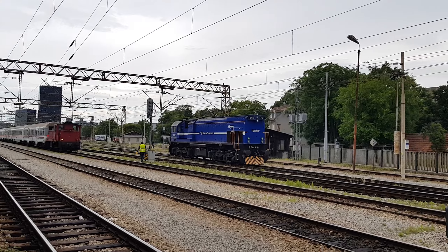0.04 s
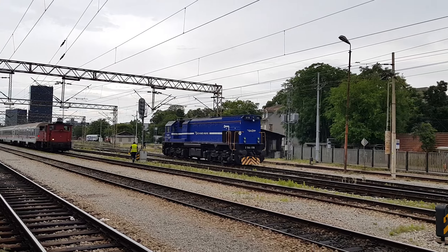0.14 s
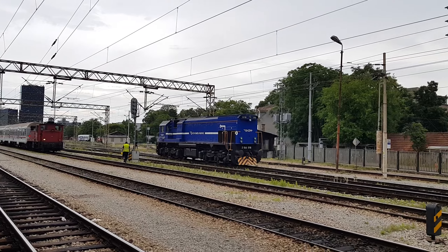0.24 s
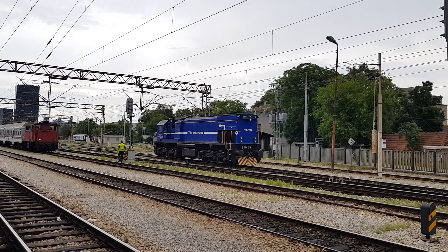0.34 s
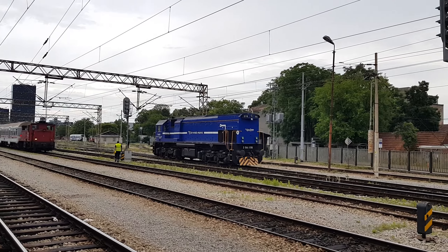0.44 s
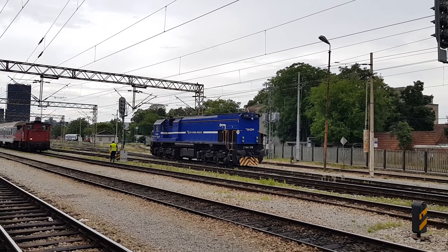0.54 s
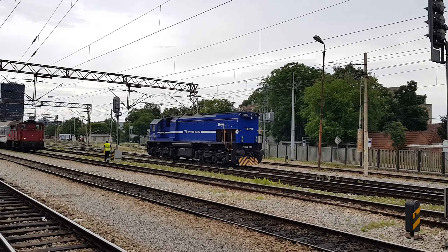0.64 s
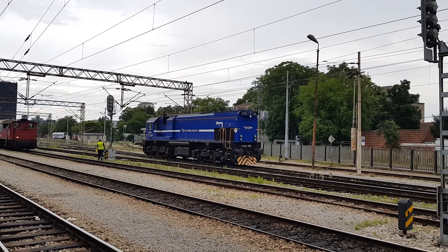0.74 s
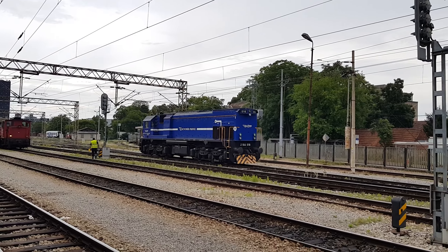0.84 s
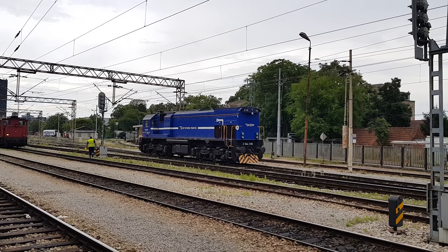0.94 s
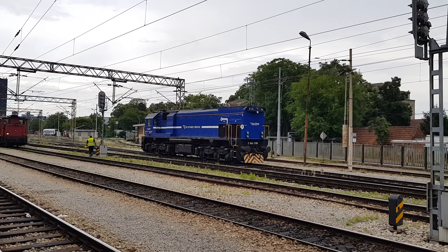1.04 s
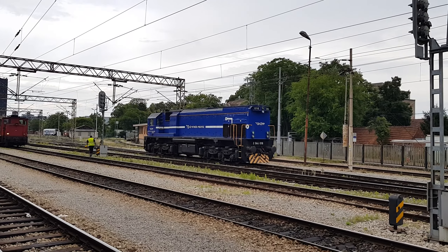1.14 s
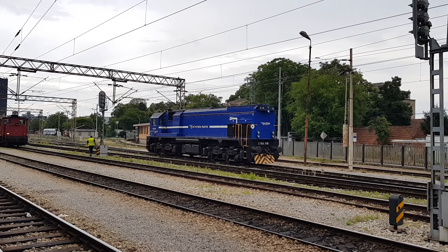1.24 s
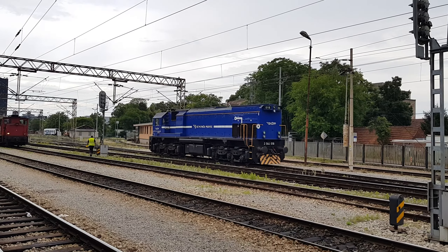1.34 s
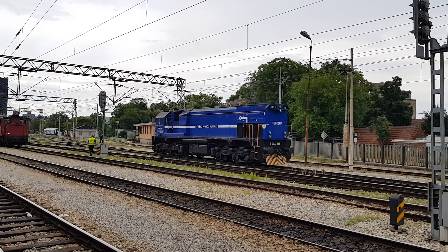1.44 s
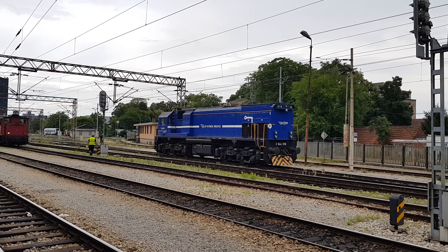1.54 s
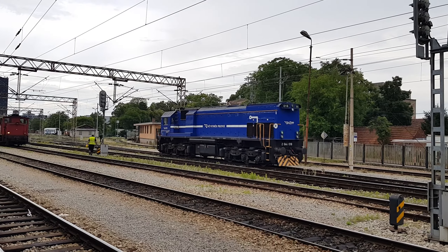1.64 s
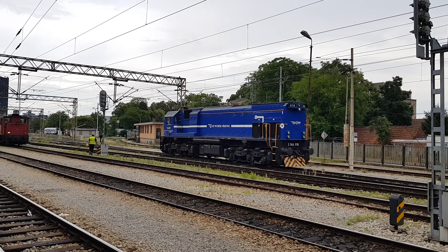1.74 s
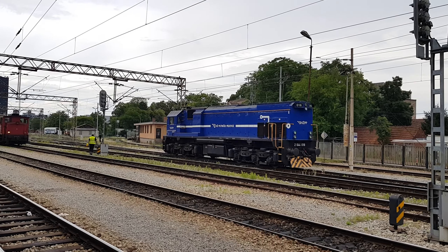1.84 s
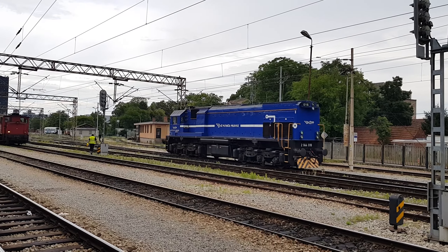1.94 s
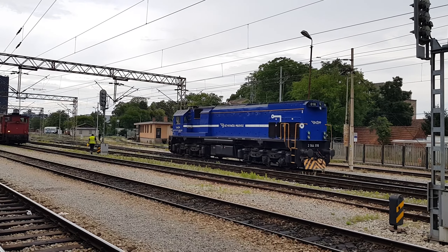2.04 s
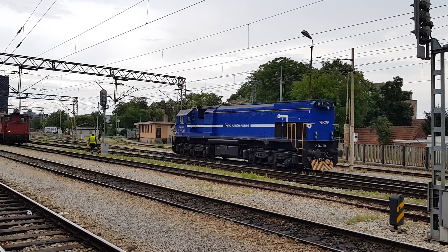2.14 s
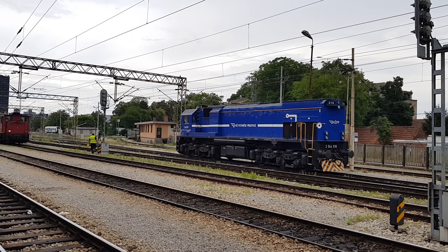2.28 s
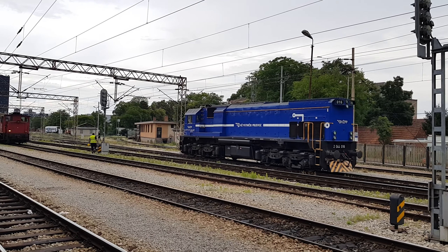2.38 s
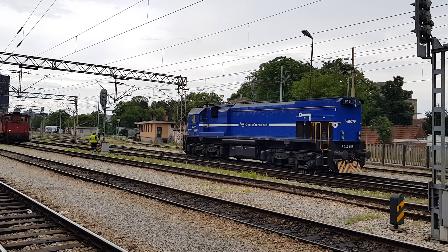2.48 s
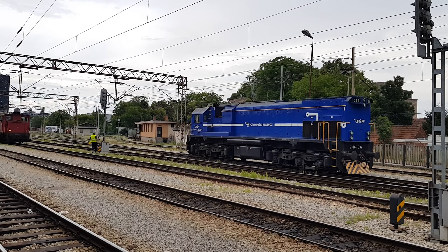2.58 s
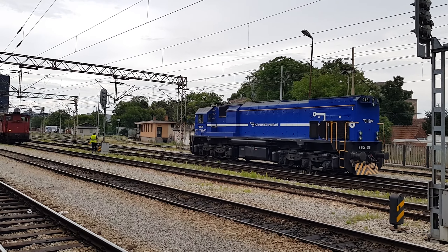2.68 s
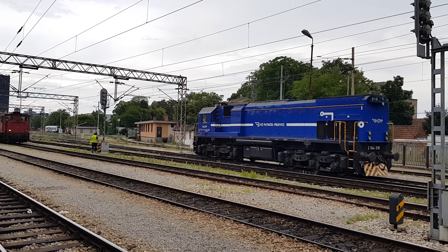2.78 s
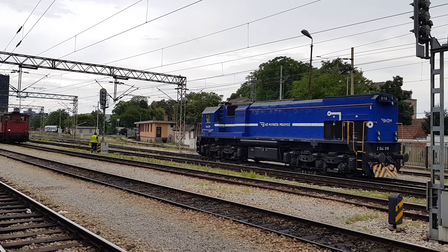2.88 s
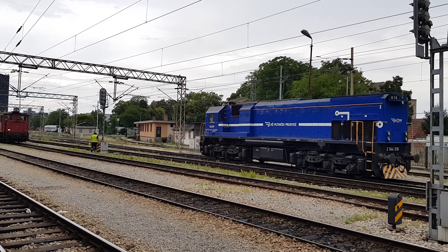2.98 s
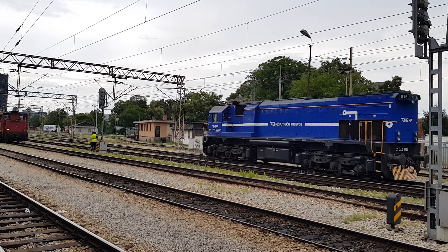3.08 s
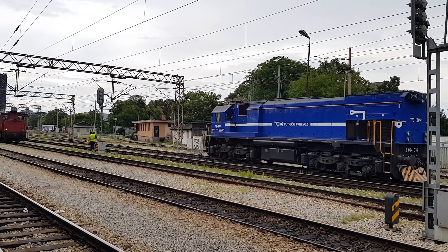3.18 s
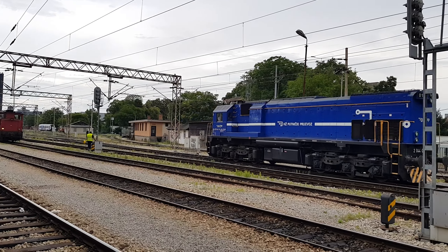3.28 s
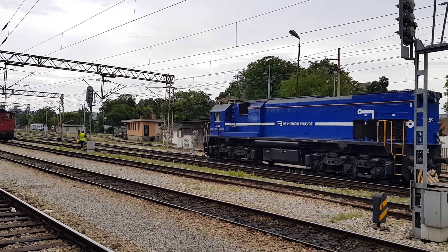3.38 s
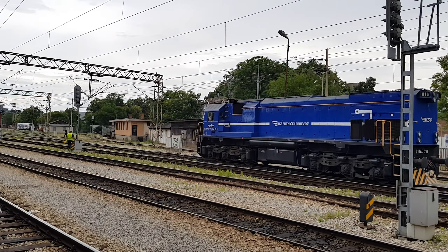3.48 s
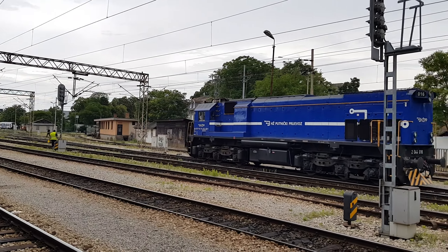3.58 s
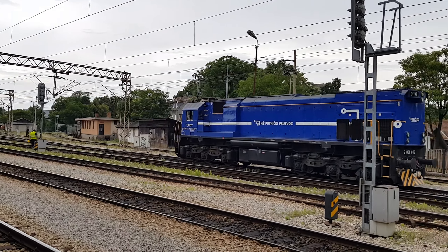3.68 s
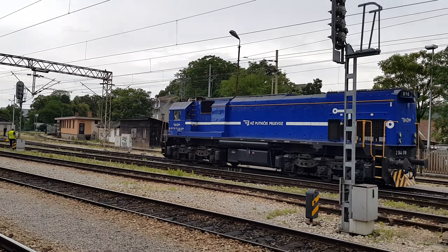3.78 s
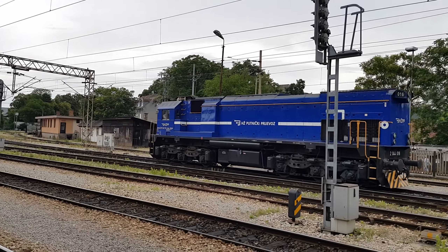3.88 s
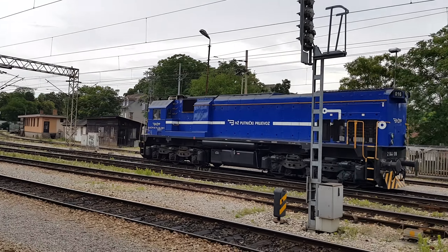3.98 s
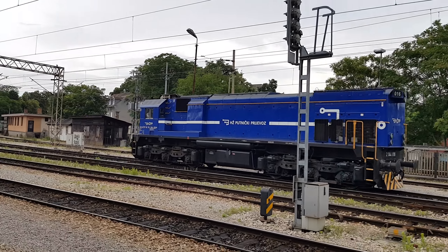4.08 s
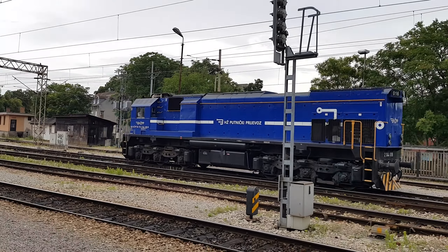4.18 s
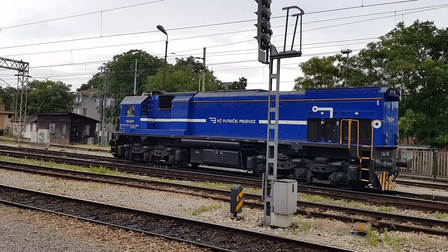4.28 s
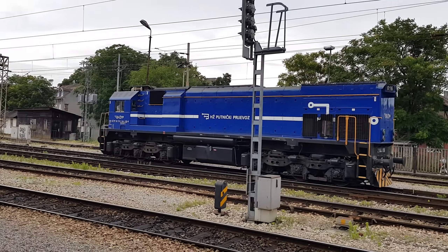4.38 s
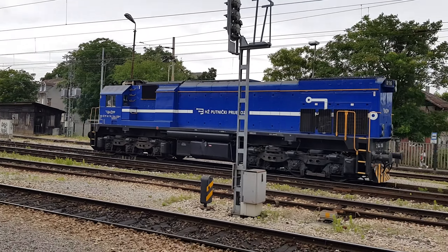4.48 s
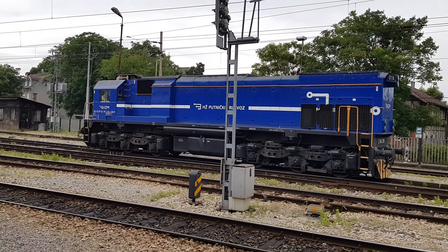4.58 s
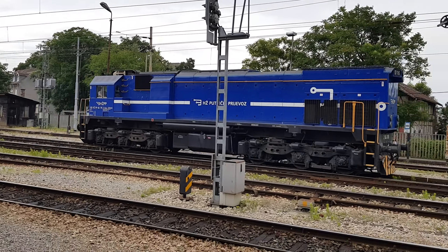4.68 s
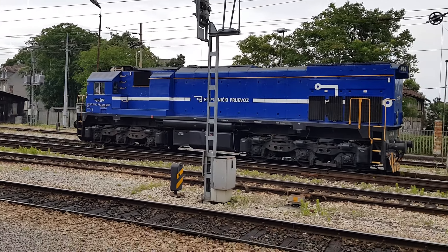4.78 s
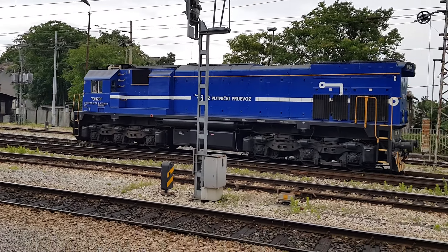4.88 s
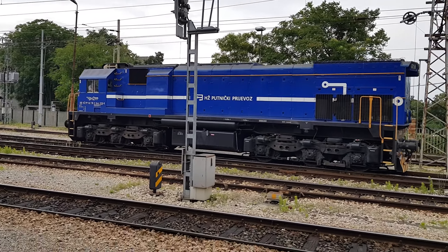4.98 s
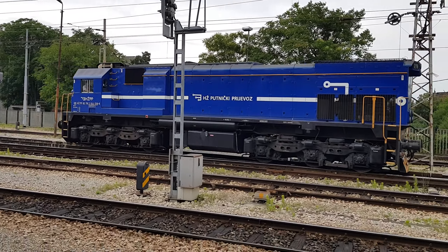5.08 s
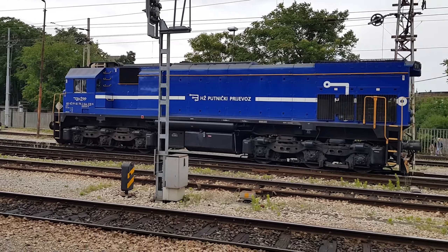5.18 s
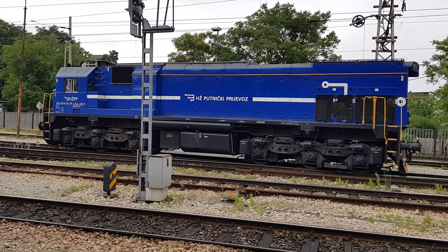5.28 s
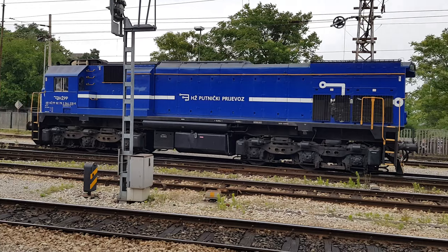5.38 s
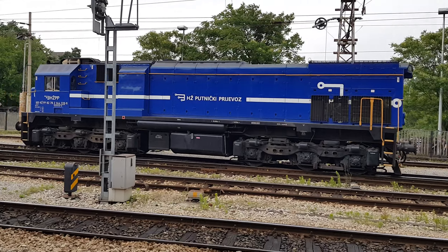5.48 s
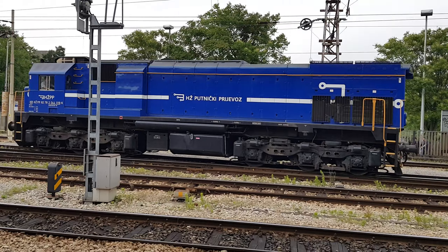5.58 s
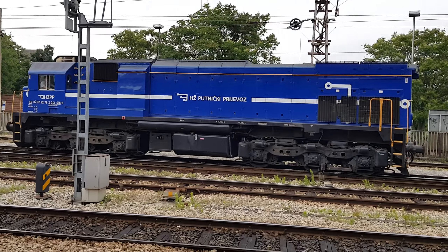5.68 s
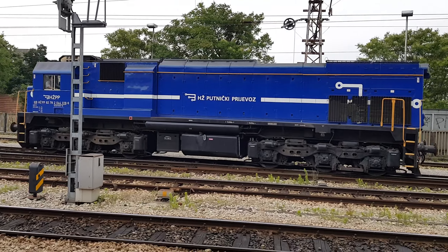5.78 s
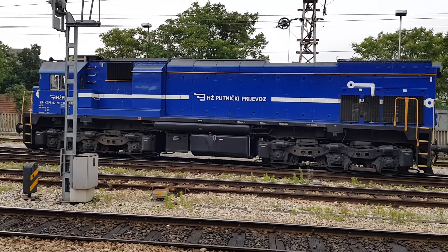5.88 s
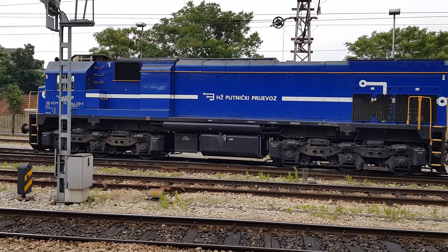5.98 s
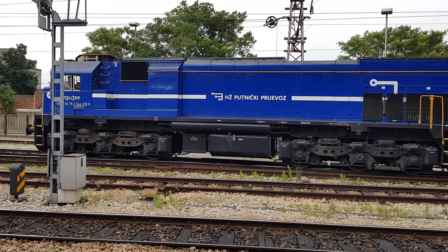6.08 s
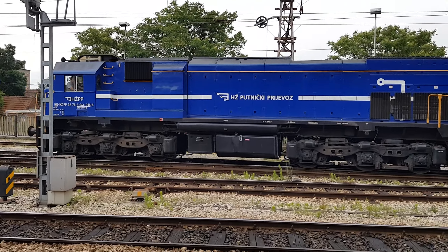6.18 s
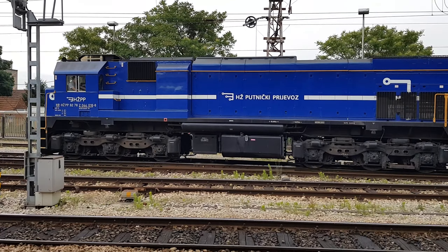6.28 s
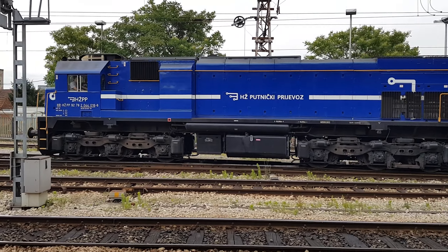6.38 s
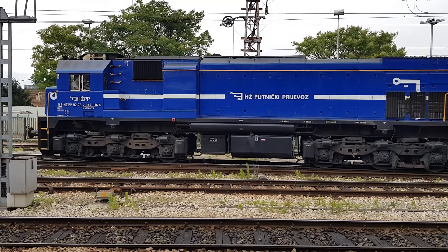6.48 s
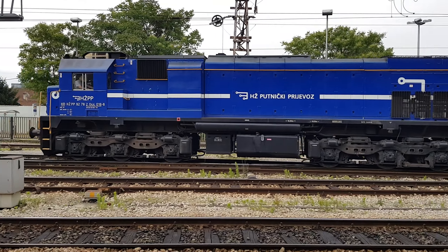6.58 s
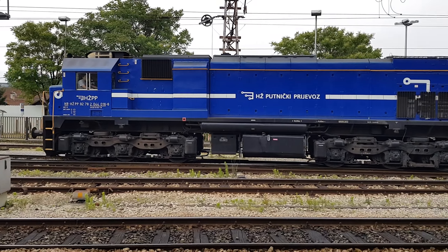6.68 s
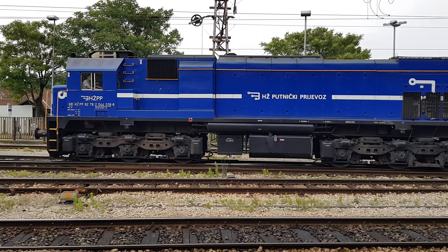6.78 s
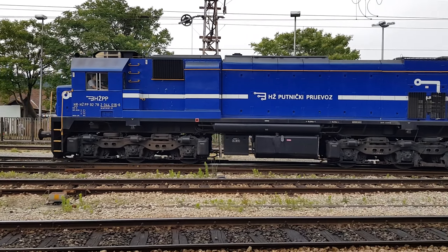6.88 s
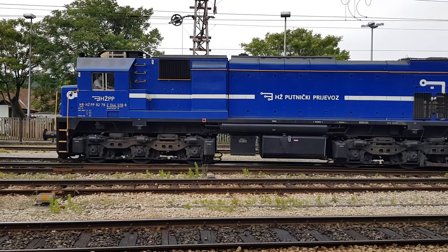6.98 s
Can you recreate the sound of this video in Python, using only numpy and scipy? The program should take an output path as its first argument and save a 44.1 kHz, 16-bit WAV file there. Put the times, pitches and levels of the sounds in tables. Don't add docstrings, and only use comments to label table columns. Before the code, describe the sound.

Outdoors beside railway tracks, a diesel engine rumbles steadily, its exhaust pulsing under a rough mechanical roar and wavering blower whine. Small metallic pings and low thuds accompany the wheels. A short scrape is followed by a piercing ringing squeal, then the engine's pitch climbs and it passes close and full, with only thin squeaks left. Heard in stereo from a hand-held device, with brief dips in the bass.

```python
import sys
import numpy as np
from scipy import signal
from scipy.io import wavfile
from scipy.ndimage import uniform_filter1d, map_coordinates

SR = 44100
rng = np.random.default_rng(int(sys.argv[2]) if len(sys.argv) > 2 else 0)


def file_out(sig):
    cols = np.atleast_2d(sig).T
    lim = np.clip(cols, -1, 1)
    pcm = np.round(lim * 32767).astype(np.int16)
    wavfile.write(sys.argv[1], SR, pcm)


def boost_factor(decibels):
    exponent = np.asarray(decibels, float) / 20
    return 10 ** exponent


N = 310023
T = np.arange(N) / SR

# (frequency [Hz], likeness [0..1])
PORT_LIKENESS = [(40, .3), (90, .3), (170, .65), (300, .55), (450, .55), (650, .87), (850, .82),
                 (1150, .55), (1400, .5), (2000, .4), (2400, .5), (3900, .45), (6000, .35)]
# (frequency [Hz], lead of the left port [rad])
RING_LEAD = [(2490, .1), (2600, 1), (2760, 1.4), (3050, -.7), (3500, -.9), (4450, 1), (5400, .3),
             (10800, -1)]


def evened(x):
    return x / np.sqrt(np.mean(abs(x) ** 2) + 1e-20)


def read(points, hz):
    f, value = np.transpose(points)
    return np.interp(np.log(hz + 1), np.log(f + 1), value)


def columns(rows, t=T):
    s, *values = np.transpose(rows)
    return [np.interp(t, s, v) for v in values]


def drift(hz, size=N):
    r = np.exp(-32 * np.pi * hz / SR)
    coarse = np.arange(size // 16 + 2)
    a, b = rng.standard_normal((2, len(coarse) + 2000))
    slow = signal.lfilter([1], [1, -2 * r, r * r], a + 1j * b)[2000:]
    return np.interp(np.arange(size) / 16, coarse, evened(slow))


def ports(hz):
    # (frequency [Hz], left minus right [dB])
    lean_db = [(60, 5.5), (250, -1), (500, 1), (950, -0.5), (1900, -0.5), (3000, 0.5), (3800, 0),
               (7000, 12.5), (12000, 4.5), (15000, 5.5)]
    # (frequency [Hz], lead of the left port [rad])
    port_lead = [(90, 0), (250, 0.12), (450, .55), (650, .45), (850, 0.62), (1150, 1.6), (1400, 1.15),
                 (2000, 1.5), (2400, 1.5), (3100, 2.1), (3900, 5.2)]
    lean = boost_factor(read(lean_db, hz) / 2)
    return np.array([lean * np.exp(1j * read(port_lead, hz)), 1 / lean])


def noise(colour, patchy_db, like=0.99, size=N):
    frames, hz = size // 256 + 5, np.fft.rfftfreq(1024, 1 / SR)[:, None]
    a, b, c, d, patches = rng.standard_normal((frames, 513, 5)).T
    patches = uniform_filter1d(patches, size=8, axis=0)
    patches = evened(uniform_filter1d(patches, size=12, axis=1))
    same = np.clip(like * read(PORT_LIKENESS, hz), 0, 1)
    left = a + 1j * b
    z = np.array([left, same * left + np.sqrt(1 - same ** 2) * (c + 1j * d)])
    outside = (hz < colour[0][0]) | (hz > colour[-1][0])
    z *= boost_factor(read(colour, hz) - 60 * outside + patchy_db * patches) * ports(hz)
    out = signal.istft(z, nperseg=1024, noverlap=768)[1][:, :size]
    return out / np.sqrt(np.mean(out.mean(0) ** 2))


def tone(turns, hz, blur_hz, steady, t=T, lead=None):
    same = np.clip(read(PORT_LIKENESS, hz), 0, 1)
    left, other = drift(blur_hz, len(t)), drift(blur_hz, len(t))
    fuzz = np.array([left, same * left + np.sqrt(1 - same ** 2) * other])
    gains = ports(hz)[:, None]
    if lead is not None:
        gains = abs(gains) * np.exp(1j * np.array([lead + 0 * t, 0 * t]))
    wave = (steady + np.sqrt(1 - steady ** 2) * fuzz) * gains * np.exp(2j * np.pi * turns)
    return np.sqrt(2) * wave.real


def voices(speed, table, beams):
    # (time [s], level [dB])
    nearness = [(0.0, -5), (0.96, -2.5), (1.5, -2), (2.3, -0.5), (2.7, 0), (3.15, -1.5), (3.56, 0),
                (4.17, 1.6), (4.48, 3), (4.72, 2), (5.4, 1.7), (5.8, 0.5), (6.03, -0.5), (6.85, 1.4),
                (7.03, 1)]
    idle, full = 5.45, 6.3
    throttle = np.clip((speed - idle) / (full - idle), 0, 1)
    near_db = columns(nearness)[0]
    levels = []
    for (idle_db, gain_db, share), rows in zip(table, beams):
        beam_db = sum(db * np.exp(-((T - s) / width) ** 2) for s, width, db in rows)
        levels.append(idle_db + gain_db * throttle + share * near_db + beam_db)
    return levels


def exhaust(speed, turns):
    # (shaft order [per turn], level against its voice [dB])
    orders = [(8, -15), (9, 0.46), (10, -2.5), (11, -17.5), (12, 0.5), (13, -7), (14, -7.5), (15, -3.5),
              (16, -1), (17, -2), (18, -11.5), (19, -16)]
    order_voice = [3, 0, 1, 3, 2, 2, 3, 3, 3, 3, 3, 3]
    # (level at idle [dB], gain at full throttle [dB], share of the nearness [0..1])
    stack = [
        (-29.5, 10.5, 0.64),
        (-39, 10, 1),
        (-39, -7.5, 0.31),
        (-30.5, -1, 0.95),
    ]
    # (time [s], half width [s], level [dB])
    stack_beams = [
        [(1.4, 0.17, 5.5), (2.45, 0.43, 5)],
        [(0.1, .4, -8), (1.4, 0.48, 17.5), (3.15, 0.99, -13), (5.1, 0.32, 9)],
        [(0.7, 0.74, 11.5), (1.4, .25, -5), (2.1, 0.22, 14), (4.1, 0.9, 13.5), (5.5, 0.36, 10.5),
         (6.65, 0.28, -12)],
        [(1.4, 0.28, 4.5), (5.0, 0.89, -7.5)],
    ]
    levels, out = voices(speed, stack, stack_beams), np.zeros(N)
    for (k, db), voice in zip(orders, order_voice):
        angle = k * (turns + .064) - .78 + .25 * (k % 3 == 1)
        steady = np.clip(.99 - 0.0087 * (k - 9), 0, 1)
        waver = steady + np.sqrt(1 - steady ** 2) * drift(0.99)
        out += boost_factor(levels[int(voice)] + db) * np.sqrt(2) * (waver * np.exp(2j * np.pi * angle)).real
    return out


def gears(speed, turns):
    mesh = [(158.3, 0), (201.3, 0), (272.3, 1), (282.6, 1), (292.5, 1), (545, 5), (554.8, 2), (565, 6),
            (838, 3), (847.8, 3), (851, 7), (1700, 4)]
    # (level against its voice [dB], blur [Hz])
    mesh_shape = [(-1, 8.6), (-15, 3.5), (-5.5, 12), (3, 9.2), (-22, 15), (6, 14), (8.5, 8), (1.5, 8.3),
                  (-4, 75), (-2, 29.6), (0, 22), (3, 180)]
    # (time [s], lead of the left port [rad])
    mesh_lead = [(0, -2), (4.45, -1.8), (5.0, -.8), (5.35, .6), (6.1, 0), (7.03, 0)]
    # (level at idle [dB], gain at full throttle [dB], share of the nearness [0..1])
    blower = [
        (-45.5, -1.5, 0.46),
        (-47, -10, 0.14),
        (-65, 4, 0.74),
        (-54.5, -4.5, 0.84),
        (-90, 11.5, .6),
        (-71.5, 5, .5),
        (-72, 0, .5),
        (-68, 6, .6),
    ]
    # (time [s], half width [s], level [dB])
    blower_beams = [
        [(0.0, .35, -4.5), (1.45, 0.19, -23), (3.85, 0.37, 3), (4.25, .1, -2), (5.35, .3, -7),
         (5.95, 0.19, -24), (6.5, .4, -6)],
        [(0.05, .1, -1), (1.05, 0.28, -7.5), (2.1, 0.28, -5), (2.55, 0.049, 4), (2.95, 0.092, 1.5),
         (3.4, 0.19, 5), (3.78, 0.13, 6), (4.05, 0.1, -3), (4.35, 0.092, 5.5), (4.9, .22, -1),
         (5.5, 0.11, 11.5), (6.2, 0.35, -9), (6.85, .2, 4)],
        [(0.1, 0.15, -8), (3.88, .04, 7), (4.08, .04, 10), (5.0, 0.055, 8), (1.7, 0.11, 1), (2.1, 0.086, 1.5),
         (3.0, 0.35, 0), (4.45, 0.49, 7.5), (5.0, 0.46, 2.5), (5.35, 0.073, 6.5), (5.52, 0.071, -5),
         (6.3, 0.26, 1), (6.8, .2, -4)],
        [(.1, 0.11, 1), (1.2, 0.31, -2.5), (2.9, .1, 1.5), (3.6, 0.56, 6.5), (4.55, 0.19, -16),
         (5.05, .25, -3.5), (5.6, 0.19, -3), (6.3, .2, 0.5), (6.85, 0.31, 6.5)],
        [(1.05, 0.18, 9), (2.8, .2, 9.8), (4.65, 0.39, 8.9), (7.0, 0.38, 7.7)],
        [(4.3, 0.18, 9), (4.75, 0.34, 17)],
        [(.85, .12, 4.4), (1.55, .4, 7.2), (4.7, .3, 7)],
        [(4.55, 0.18, -12), (5.1, .3, 4.5), (6.3, .7, -6)],
    ]
    levels, turning = voices(speed, blower, blower_beams), columns(mesh_lead)[0]
    out = np.zeros((2, N))
    for (k, voice), (db, blur_hz) in zip(mesh, mesh_shape):
        flutter_db = 3.0 * drift(40.).real
        lead = turning if voice in (2, 5, 6) else None
        steady = 0.78 * (blur_hz < 20)
        line = tone(k * turns, k * speed.mean(), blur_hz, steady, T, lead)
        out += boost_factor(levels[int(voice)] + db + flutter_db) * line
    return out


def roar(speed, turns):
    # (frequency [Hz], density [dB/Hz])
    rumble = [(33, -18), (40, -3.5), (70, 2.5), (110, -1), (160, -6), (205, -5.5), (240, -3.5), (285, -11),
              (400, -10), (500, -23.5), (600, -9)]
    # (frequency [Hz], density [dB/Hz])
    body = [(260, -22), (450, -12), (513, -7), (561, -4.5), (718, 0), (876, -9.5), (1040, -25), (1100, -43),
            (1430, -35), (2420, -120)]
    # (frequency [Hz], density [dB/Hz])
    clatter_colours = [
        [(560, -51), (950, -14), (1180, -3.5), (1520, -3.5), (1790, -7.5), (2010, -1.5), (2840, -8.5),
         (3080, -7), (4320, -18), (4640, -27), (4990, -28.5), (8000, -49), (10400, -69), (17600, -120)],
        [(560, -24), (950, -2), (1110, -1), (1700, -2), (2400, -7.5), (2700, -7.5), (3080, -9.5), (3490, -9.5),
         (4770, -23.5), (5360, -27), (5860, -28), (8000, -66.5), (10400, -94), (17600, -120)],
    ]
    # (level at idle [dB], gain at full throttle [dB], share of the nearness [0..1])
    panels = [
        (-31.5, 2.83, 0.87),
        (-33.5, 0.19, 0.82),
        (-43, 2.85, 0.9),
    ]
    # (time [s], half width [s], level [dB])
    panel_beams = [
        [(1.37, 0.15, 3), (2.3, 0.12, -2), (1.75, .12, 3), (1.2, .07, 3), (3.2, .12, 2.5), (6.85, .12, -3),
         (5.85, 0.065, 2.5), (5.45, .1, -4.5), (3.4, 0.086, -3), (1.585, 0.087, -2.5)],
        [(2.7, 0.32, 2.2), (3.7, .15, 2.8), (3.98, .1, 2), (4.72, .1, -2.5)],
        [(0.2, 0.25, 1.3), (6.05, 0.17, 1.4)],
    ]
    rumble_db, body_db, clatter_db = voices(speed, panels, panel_beams)
    thump = np.cos(2 * np.pi * (3 * turns + 0.13)) + 1.58 * np.cos(2 * np.pi * (6 * turns + 0.26))
    firing = np.cos(2 * np.pi * 16 * turns)
    gust = drift(26.0).real * np.sqrt(2)
    out = boost_factor(rumble_db + 1.5 + 0.32 * thump + 1.88 * gust) * noise(rumble, 0.62)
    out += boost_factor(body_db + 0.65 + 0.44 * thump + 0.66 * gust) * noise(body, 0.66)
    near = np.clip(T / 4.9, 0, 1)
    clatter = np.sqrt(1 - near) * noise(clatter_colours[0], 1.9)
    clatter += np.sqrt(near) * noise(clatter_colours[1], 0.96)
    return out + boost_factor(clatter_db - 1.08 + 0.48 * thump + 0.85 * firing + 1.13 * gust) * clatter


def flanges():
    # (peak time [s], level [dB], rise [dB/s], fall [dB/s])
    scrapes = [
        [(2.762, -51, 4000, 700), (2.785, -51, 1500, 300), (2.8, -54.5, 300, 85), (2.84, -57, 300, 122),
         (2.89, -61.5, 400, 90)],
        [(4.462, -56, 4000, 300), (4.478, -47.5, 900, 65), (4.538, -50, 124, 300), (4.6, -46, 112, 101)],
        [(5.118, -60, 196, 331), (5.282, -59, 131, 600), (5.338, -63, 198, 177)],
        [(5.684, -67, 170, 40), (5.822, -68, 1500, 144)],
        [(6.66, -66, 107.5, 60), (6.708, -56, 3000, 220), (6.79, -67, 200, 199.5), (6.85, -72, 200, 100),
         (6.91, -74, 300, 150), (7.01, -70, 200, 60)],
    ]
    # (frequency [Hz], density [dB/Hz])
    grinds = [
        [(3000, -29), (5400, -32), (7600, -20), (9500, -15), (11800, 1), (14000, -9), (15600, -20)],
        [(2000, -30), (3500, -19), (5500, -26), (7500, -40.5), (9500, -28), (12000, -13), (14000, -22),
         (15600, -31.5)],
    ]
    # (ring against its curve [dB], grind against its curve [dB])
    shares = [(1.5, -3), (3.5, -0.5), (-4.5, -15), (-3, -7), (-3, -4)]
    # (frequency [Hz], width [Hz], level [dB], swell [dB/s])
    far_wheel = [(1752, 30, -3, 0), (1985, 30, -6, 0), (2770, 28, -9, 20), (3530, 34, -14, 20),
                 (4461, 25, -9, 70), (5420, 250, -19, 45), (6300, 260, -27, 0), (9590, 300, -23, 20),
                 (10600, 200, -24, 10), (11700, 160, -23, 0), (13200, 160, -25, 0)]
    # (frequency [Hz], width [Hz], level [dB], swell [dB/s])
    near_wheel = [(2490, 40, -20, -250), (2580, 16, -8, -25), (2602, 16, -8, -25), (2757, 14, -8, 10),
                  (3200, 40, -13, 20), (3481, 22, -16, 60), (3520, 30, -15, 60), (4457, 30, -18, 0),
                  (3330, 60, -17, 20), (3900, 120, -25, 0), (4950, 120, -33, 0), (5378, 50, -18, 0),
                  (5572, 40, -23, 20), (6115, 40, -31, 0), (6325, 60, -27, 10), (7025, 40, -33, 30),
                  (7246, 40, -34, 25),
                  (8193, 40, -38, 10), (9103, 40, -33, 10), (9480, 40, -35, 10), (10002, 24, -21, 40),
                 (10551, 60, -28, 10), (10810, 30, -16, 0), (11461, 60, -27, 10), (11907, 30, -14, 0),
                 (12285, 30, -12, -25), (12699, 40, -25, 30), (13860, 70, -25, 10), (14400, 40, -29, 0),
                 (14530, 40, -26, 0), (15057, 60, -29, 12)]
    # (frequency [Hz], width [Hz], level [dB])
    squeaks = [
        [(10000, 29, -10), (10800, 35, -4.5), (11900, 62, -18), (14400, 90, -15)],
        [(10100, 69, -1), (10700, 170, 2.5), (12200, 82, -2), (14900, 31, -3)],
        [(9050, 27, -15), (10100, 69, -6), (10800, 37, -2), (12300, 59, -7), (12900, 82, -13), (13650, 50, -10),
         (14400, 140, -12), (14900, 44, -4)],
    ]
    lead_in_s, ring_out_s = .12, .45
    wheels = [far_wheel, near_wheel, *squeaks]
    out = np.zeros((2, N))
    for k, (rows, rings, (ring_db, grind_db)) in enumerate(zip(scrapes, wheels, shares)):
        start_s, _, first_rise, _ = rows[0]
        first = round((start_s - lead_in_s) * SR)
        t = T[first:first + SR]
        age = np.clip(t - start_s, 0, ring_out_s) - .1
        ring = np.zeros((2, len(t)))
        for hz, width, db, *swell in rings:
            level = boost_factor(db + sum(swell) * age + 3.8 * drift(19.0, len(t)).real) * np.sqrt(width)
            ring += level * tone(hz * t, hz, 0.79 * width, 0.46, t, read(RING_LEAD, hz))
        ring /= np.sqrt(sum(width * boost_factor(2 * db) for _, width, db, *_ in rings))
        grind = noise(grinds[k] if k < 2 else grinds[1][-4:], 3.6, size=len(t))
        slips_db = 2.0 * drift(40., len(t)).real
        fade_db = 22 * age * (k > 0)
        both = boost_factor(ring_db) * ring + boost_factor(grind_db + slips_db - fade_db) * grind
        touch = boost_factor(np.minimum(first_rise * (t - start_s), 0))
        pressure = sum(boost_factor(db + np.minimum(rise * (t - s), fall * (s - t))) for s, db, rise, fall in rows)
        out[:, first:first + len(t)] += pressure * both * touch
    return out


def pings():
    # (time [s], frequency [Hz], level [dB], held [s], t60 [s])
    strikes = [(0.16, 3065, -49.5, .065, .06), (.3, 3060, -51, 0.013, .15), (.165, 3395, -59, .14, .1),
               (2.893, 4461, -50, 0.037, .12), (2.95, 4461, -56, .025, .08), (3.0, 4461, -57, .03, .08),
               (2.83, 3530, -63, .05, .1), (4.457, 2490, -42, .012, .1), (4.468, 2580, -43, 0.11, .6),
               (4.475, 2602, -39.5, .09, .5), (4.49, 2757, -47, 0.071, .3), (4.57, 2757, -41, .02, 0.54),
               (4.472, 4100, -53, .02, .12), (4.49, 3520, -50, .08, .2), (4.598, 3495, -43, .035, .25),
               (4.655, 3510, -46, .02, .1), (4.66, 5572, -61, .05, .3), (4.5, 6325, -64, .12, .2),
               (4.725, 3500, -46, 0.045, 0.27), (4.84, 3495, -51, .04, .2), (4.512, 4457, -48.5, 0.032, .2),
               (4.625, 4457, -51, .025, .15), (4.512, 5378, -51, .075, .25), (4.575, 3330, -50, .03, 0.13),
               (6.707, 13650, -65, .03, .15), (6.775, 12300, -73, .03, .08), (6.865, 13750, -76, .04, .06),
               (6.9, 10800, -71, .03, .15), (2.79, 1752, -47, .06, .15), (2.82, 5400, -63, .05, .1),
               (2.91, 5420, -66, .04, .1), (7.0, 10100, -70, .03, .1)]
    out = np.zeros((2, N))
    for s, hz, db, held, t60 in strikes:
        first, t = round(s * SR), T[:round(.6 * SR)]
        fade = boost_factor(db - 60 * np.maximum(t - held, 0) / t60) * (1 - np.exp(-t / 0.0018))
        ring = fade * tone(hz * t, hz, 23.0, 0.86, t, read(RING_LEAD, hz))
        out[:, first:first + len(t)] += ring[:, :N - first]
    return out


def knocks():
    # (time [s], level [dB], lowest [Hz], highest [Hz], t60 [s])
    jolts = [(0.15, -71, 3380, 3700, 0.58), (1.8, -55.5, 3200, 3450, 0.48), (1.022, -31.5, 34, 480, 0.46),
             (1.32, -41, 40, 310, 0.27), (2.147, -39.5, 40.3, 320, 0.23), (2.225, -35, 225, 280, 0.22),
             (2.33, -40, 200, 298, .5), (1.36, -38, 120, 250, 0.33), (1.79, -35, 116, 229, 0.56),
             (1.949, -35.5, 190, 350, 0.16), (3.099, -40.5, 194, 272, 2.6), (2.311, -30.5, 27, 320, 0.21),
             (2.78, -50, 1900, 2700, 0.28), (2.798, -42.5, 1000, 2700, 0.41),
             (2.847, -31.5, 780, 1100, 0.042), (2.88, -47, 1310, 2300, 0.18), (2.915, -43, 800, 2000, 0.11),
             (2.826, -32, 600, 1610, 0.043), (4.5, -37, 1490, 2600, .08), (3.023, -39, 40, 400, 0.2),
             (4.46, -43.5, 780, 2950, 0.29), (4.58, -25.5, 100, 455, 0.072), (5.225, -28, 36, 400, 0.31),
             (5.24, -44, 940, 2900, 0.44), (5.812, -41, 970, 3900, 0.17), (6.069, -32, 35, 292, 0.12),
             (4.495, -32.5, 230, 400, 0.17), (5.83, -31.5, 180, 290, .4), (5.04, -35, 140, 320, .5),
             (.27, -39, 120, 270, 0.33), (3.35, -36.5, 190, 280, .25), (6.706, -65.5, 6000, 15500, .12),
             (4.458, -50, 2000, 6500, .06)]
    out = np.zeros((2, N))
    for s, db, low_hz, high_hz, t60 in jolts:
        first, t = round(s * SR), T[:round(t60 * SR)]
        band = [(low_hz, -8), (np.sqrt(low_hz * high_hz), 0), (high_hz, -9)]
        burst = noise(band, 2.5, size=len(t))
        out[:, first:first + len(t)] += boost_factor(db - 60 * t / t60 + 6.5) * (1 - np.exp(-t / 0.003)) * burst
    return out


def scene():
    # (time [s], speed [turns/s])
    shaft = [(0.0, 5.544), (0.35, 5.543), (0.7, 5.513), (1.4, 5.467), (2.1, 5.444), (2.45, 5.439),
             (3.5, 5.399), (3.85, 5.409), (4.2, 5.553), (5.25, 6.137), (5.6, 6.27), (5.95, 6.325),
             (6.3, 6.312), (7.03, 6.246)]
    # (time [s], extra delay [ms])
    swing = [(0.0, .07), (1.9, .07), (2.6, .01), (7.03, -.01)]
    speed = columns(shaft)[0]
    turns = np.cumsum(speed) / SR
    left, right = exhaust(speed, turns) + gears(speed, turns) + roar(speed, turns)
    later = np.arange(N) - columns(swing)[0] * SR / 1000
    right = map_coordinates(right, [later], order=3, mode="nearest")
    return np.array([left, right]) + flanges() + pings() + knocks()


def top_cut(x):
    return signal.sosfilt(signal.butter(12, 15770, fs=SR, output="sos"), x)


def record(dry):
    # (start [s], end [s], level [dB])
    bass_cuts = [(.37, .4, -8), (.56, .585, -12), (0.898, 0.966, -12), (2.02, 2.13, -12), (2.26, 2.31, -17),
                 (2.953, 3.01, -10), (5.269, 5.293, -28), (6.06, 6.117, -4.5)]
    # (frequency [Hz], density [dB/Hz])
    hiss_colour = [(6000, -6.5), (7400, -2), (9300, -.5), (11700, 1), (14000, -2.5), (15760, -1.5)]
    cut_db = sum(db * ((T > start) & (T < end)) for start, end, db in bass_cuts)
    cut_db = uniform_filter1d(uniform_filter1d(cut_db, size=500), size=400)
    bass = signal.sosfiltfilt(signal.butter(2, 140., fs=SR, output="sos"), dry)
    low_cut = signal.butter(1, 10., "high", fs=SR, output="sos")
    guarded = signal.sosfilt(low_cut, dry) - bass * (1 - boost_factor(cut_db))
    duck_db = 3 * np.clip(T - 4.4, 0, 1)
    hiss_db = -73 + np.array([[2.5], [-3.5]]) - duck_db
    hiss = boost_factor(hiss_db) * noise(hiss_colour, .6, like=.6)
    ceiling = 0.95
    return top_cut(ceiling * np.tanh(guarded / ceiling) + hiss)


dry = scene()
out = record(dry)
file_out(out)
```